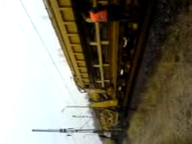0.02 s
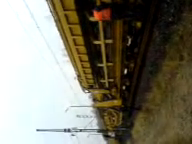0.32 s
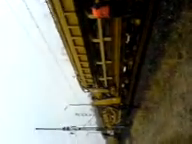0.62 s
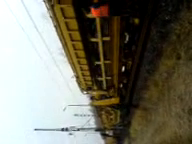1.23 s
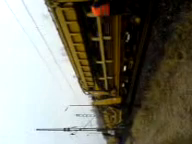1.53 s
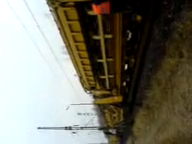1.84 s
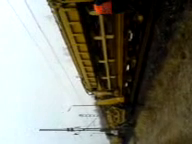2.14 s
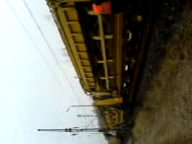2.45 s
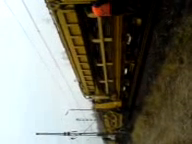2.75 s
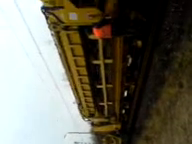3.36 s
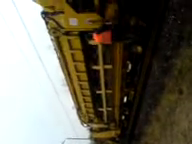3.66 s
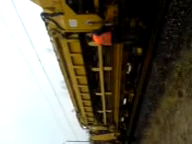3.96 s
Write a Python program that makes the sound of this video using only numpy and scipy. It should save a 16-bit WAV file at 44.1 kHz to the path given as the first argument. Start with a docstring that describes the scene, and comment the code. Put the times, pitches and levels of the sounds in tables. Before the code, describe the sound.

A track renewal machine roars and rattles close by, with metal crashes and squeals.

```python
"""A steady engine roar with gear whines and a dense rattle of chains and ballast on steel:
a track renewal machine working close by. Loads crash into the steelwork and a dry bearing squeals
on and off. The frame groans and booms under load, loudest near the end.
A small narrow-band recorder overloads on everything loud; brief overloads sound as short ticks."""
import sys
import numpy as np
from scipy import signal
from scipy.io import wavfile
from scipy.ndimage import uniform_filter1d, minimum_filter1d

SR = 44100
rng = np.random.default_rng(int(sys.argv[2]) if len(sys.argv) > 2 else 0)


def bounce(signal):
    """Save signal as a 16-bit WAV file at the path given by the first command-line argument."""
    frames = np.transpose(np.atleast_2d(signal))
    limited = np.clip(frames, -1, 1)
    pcm = np.round(limited * 32767).astype(np.int16)
    wavfile.write(sys.argv[1], SR, pcm)


N = 176400


def from_db(db):
    """Decibels to gain."""
    return 10 ** (np.asarray(db) / 20)


def unit_rms(x):
    """Scale to unit power."""
    return x / np.sqrt(np.mean(x ** 2) + 1e-20)


def seconds():
    """Time of every sample."""
    return np.arange(N) / SR


def gain_curve(points):
    """Gain over time from (time_s, level_db) points."""
    return from_db(np.interp(seconds(), *np.transpose(points)))


def gain_at(spectrum, hz):
    """Gain of a spectrum at one frequency."""
    freq_hz, level_db = np.transpose(spectrum)
    return from_db(np.interp(np.log(hz), np.log(freq_hz), level_db))


def drift(rate_hz):
    """Smooth random motion of spread 1."""
    step, settle = 40, 2000
    pole = np.exp(-2 * np.pi * rate_hz * step / SR)
    white = rng.standard_normal(N // step + settle + 2)
    slow = signal.lfilter([1], [1, -2 * pole, pole * pole], white)[settle:]
    return np.interp(np.arange(N) / step, np.arange(len(slow)), unit_rms(slow))


def resonate(x, hz, width_hz):
    """Two-pole resonance, peak gain 1."""
    radius = np.exp(-np.pi * width_hz / SR)
    feedforward = np.array([1, 0, -1]) * (1 - radius ** 2) / 2
    feedback = [1, -2 * radius * np.cos(2 * np.pi * hz / SR), radius ** 2]
    return signal.lfilter(feedforward, feedback, x + 1e-18)


def shaken(hz, width_hz):
    """A resonance driven by steady random force, levelled to unit power."""
    x = resonate(rng.standard_normal(N), hz, width_hz)
    return x / np.sqrt(uniform_filter1d(x * x, size=2600) + 1e-20)


def banded_noise(spectrum, flicker_db):
    """Quarter-octave noise bands, each flickering on its own; unit power overall."""
    edges_hz = 20 * 2 ** np.arange(0, 8.1, .25)
    out, white = 0, rng.standard_normal((2, N + SR // 2))
    for k, (low, high) in enumerate(zip(edges_hz, edges_hz[1:])):
        bandpass = signal.butter(2, [low, high], "band", fs=SR, output="sos")
        band = signal.sosfilt(bandpass, white[k % 2])[-N:]
        out += band * gain_at(spectrum, np.sqrt(low * high)) * from_db(flicker_db * drift(15.8))
    return unit_rms(out)


def envelope(start_s, end_s, attack_s, t60_s):
    """Rise around the start, hold to the end, then die away."""
    t = seconds()
    rise = np.clip((t - start_s) / attack_s + .5, 0, 1)
    return rise * from_db(-60 * np.maximum(t - end_s, 0) / t60_s)


# Engine roar level: time_s, level_db
ROAR_CURVE = [(0, -10.5), (.3, -21), (.38, -21), (.47, -18.5), (.62, -17), (1.5, -18.5), (1.6, -16),
              (1.73, -19.5), (1.9, -16.5), (2.25, -19.5), (2.6, -16), (2.85, -18.5), (3.42, -19),
              (3.55, -18), (3.68, -4), (3.8, -14), (3.9, 7), (4, -13)]
# Engine roar spectrum: freq_hz, relative_density_db
ROAR_SPECTRUM = [(25, -36), (60, -16.5), (120, -13), (200, -13), (270, -3.5), (330, 2), (420, -6),
                 (540, -10), (740, -2), (900, -6), (1150, -10), (1450, -11), (2200, -19.5)]


def engine_roar():
    """The engines roar as broad noise with an uneven throb."""
    throb_db = 0.65 * drift(rate_hz=6.5)
    return gain_curve(ROAR_CURVE) * from_db(throb_db) * banded_noise(ROAR_SPECTRUM, flicker_db=1.6)


# Gear and pump whines: pitch_hz, level_db
GEAR_TONES = [(334, -36), (1502, -34.5), (1793, -34)]
# Two drives taking load: pitch_hz, [(time_s, level_db)]
DRIVE_TONES = [(672, [(0, -28.5), (.9, -27.5), (1.3, -28), (1.8, -41), (2.15, -39), (2.25, -24),
               (2.48, -25.5), (2.6, -44.5), (4, -34.5)]), (754, [(0, -27), (.6, -26.5), (1.3, -33.5),
               (2.0, -25), (2.7, -40), (4, -26.5)])]


def whines(wander=0.0025, flutter_db=4):
    """Gears and pumps whine throughout, drives sing as they take load; all waver and flutter."""
    voices = [(hz, from_db(level_db)) for hz, level_db in GEAR_TONES]
    voices += [(hz, gain_curve(load)) for hz, load in DRIVE_TONES]
    out = 0
    for pitch_hz, gain in voices:
        phase = 2 * np.pi * np.cumsum(pitch_hz * (1 + wander * drift(14.0))) / SR
        flutter = from_db(flutter_db * drift(8.3))
        out += gain * unit_rms(np.sin(phase) * flutter)
    return out


# Chain and ballast rattle level: time_s, level_db
RATTLE_CURVE = [(0, -11.5), (.3, -16.5), (.43, -13), (.7, -13.5), (.83, -16), (.92, -11.5), (1.0, -17),
                (1.08, -13.5), (1.16, -13.5), (1.5, -18), (1.75, -15.5), (1.9, -13.5), (2.1, -15),
                (2.8, -16), (3.55, -15), (3.64, -9.5), (4, -5)]
# Rattle spectrum: freq_hz, relative_density_db
RATTLE_SPECTRUM = [(900, -21.5), (1400, -17), (1800, -3), (2050, -2.5), (2350, 0.5), (2650, 0),
                   (2950, -10.5), (3250, -6), (3550, -12), (4200, -5.5)]


def rattle(knocks_per_s=320, spread_db=1.5, t60_s=0.099, ring_db=-2):
    """Links and stones knock on many short-ringing steel parts, over a wash of grinding."""
    parts_hz = np.geomspace(1650, 3200, num=30)
    force = from_db(spread_db * np.minimum(rng.exponential(1, N), 4)) * rng.choice([-1, 1], N)
    knocks = force * (rng.random(N) < knocks_per_s / SR)
    struck_part = rng.integers(0, len(parts_hz), N)
    width_hz = np.log(1000) / (np.pi * t60_s)
    rings = sum(gain_at(RATTLE_SPECTRUM, hz) * resonate(knocks * (struck_part == k), hz, width_hz)
                for k, hz in enumerate(parts_hz))
    grinding = banded_noise(RATTLE_SPECTRUM, flicker_db=1.5)
    return gain_curve(RATTLE_CURVE) * unit_rms(from_db(ring_db) * unit_rms(rings) + grinding)


# Chute and frame resonances: pitch_hz, width_hz, relative_db
CHUTE_MODES = [(1510, 790, -7.5), (2020, 300, -6), (2380, 210, -8), (2695, 1300, -0.5)]
FRAME_MODES = [(328, 230, -7), (735, 134, -2)]
# Loads hitting the steelwork: start_s, length_s, clatter_db, thud_db, ring_hz, ring_db
LOAD_CRASHES = [(0.037, 0.027, -31, -13.5, 800, -8), (0.062, 0.0089, -13, -24.5, 2090, -11),
                (0.382, 0.02, -11.5, -26, 2380, -9.5), (1.043, 0.018, -13.5, -35, 3030, -17),
                (1.776, 0.031, -5, -13, 2680, -21), (1.811, 0.012, -11, -9.5, 2070, -8),
                (3.367, 0.0097, -16.5, -18, 2624, -7), (3.388, 0.0055, -29, -36, 2810, -12),
                (3.576, 0.014, -6.5, -17, 2020, -20), (3.624, 0.059, -6.5, -17.5, 2345, -15),
                (3.759, 0.09, -8, -17.5, 2320, -16), (3.844, 0.067, -4.5, -17, 2500, -11),
                (3.926, 0.029, -3, -4.5, 2380, -12)]


def crashes():
    """Each load is a burst of contacts that shakes the chute, the frame and one ringing part."""
    chute = unit_rms(sum(from_db(db) * shaken(hz, width_hz) for hz, width_hz, db in CHUTE_MODES))
    frame = unit_rms(sum(from_db(db) * shaken(hz, width_hz) for hz, width_hz, db in FRAME_MODES))
    out = 0
    for start_s, length_s, clatter_db, thud_db, ring_hz, ring_db in LOAD_CRASHES:
        burst = envelope(start_s, start_s + length_s, attack_s=0.015, t60_s=0.18)
        ring = from_db(ring_db) * shaken(ring_hz, width_hz=68)
        out += burst * (from_db(clatter_db) * chute + from_db(thud_db) * frame + ring)
    return out


# Dry bearing squeals: middle_s, length_s, pitch_hz, glide_hz_per_s, level_db
BEARING_SQUEALS = [(0.1, 0.1, 2180, 2, -18.5), (0.53, 0.14, 1940, -7.5, -18.5),
                   (0.781, 0.19, 1877, -500, -23.5), (0.907, 0.069, 3340, 6, -20.5),
                   (1.072, 0.15, 3198, -0.5, -24), (1.294, 0.25, 3330, -0.5, -23),
                   (1.303, 0.95, 3340, 0, -29), (1.898, 0.14, 2657, -1.5, -19),
                   (1.954, 0.19, 2514, -1, -20.5), (2.972, 0.12, 3160, 2801.5, -27.5),
                   (3.098, 0.054, 3420, 2, -19), (3.427, 0.082, 1988, 0, -18.5),
                   (3.435, 0.18, 3000, 999.5, -27.5)]


def squeals(roughness=0.73, slip_hz=28, wander=0.002074, scrape_db=-4.5):
    """Dry steel scrapes and sings, swelling and fading; uneven slipping roughens the note."""
    out = 0
    for middle_s, length_s, pitch_hz, glide_hz_per_s, level_db in BEARING_SQUEALS:
        t = np.clip(seconds() - middle_s, -length_s / 2, length_s / 2)
        slip = (drift(slip_hz) + 1j * drift(slip_hz)) / np.sqrt(2)  # jitters level and phase
        grip = np.sqrt(1 - roughness ** 2) + roughness * slip
        hz = (pitch_hz + glide_hz_per_s * t) * (1 + wander * drift(19.3))
        phase = 2 * np.pi * np.cumsum(hz) / SR
        note = np.sqrt(2) * np.real(grip * np.exp(1j * phase))
        scrape = from_db(scrape_db) * shaken(pitch_hz, width_hz=190)
        swell = np.sqrt(np.abs(np.cos(np.pi * t / length_s)))
        out += from_db(level_db) * swell * (note + scrape)
    return out


# Brief peaks in the din: start_s
OVERLOAD_TICKS_S = [.242, .347, .51, .703, .738, .900, .949, 1.019, 1.358, 1.944, 1.978, 2.038, 2.068,
                    2.144, 2.215, 2.265, 2.319, 2.645, 3.519, 3.546]


def overload_ticks(pitches_hz=(760, 2130), t60_s=0.014, peak_db=-3.8):
    """Short ticks: sharp peaks added to the din at set times briefly overload the recorder."""
    impulses = np.zeros(N)
    impulses[(np.array(OVERLOAD_TICKS_S) * SR).astype(int)] = from_db(peak_db)
    t = np.arange(SR // 20) / SR
    tick = from_db(-60 * t / t60_s) * sum(np.sin(2 * np.pi * hz * t) for hz in pitches_hz)
    return signal.fftconvolve(impulses, tick / np.abs(tick).max())[:N]


# Frame booms and groans: start_s, end_s, pitch_hz, width_hz, level_db
FRAME_GROANS = [(.445, 0.471, 464, 31, -15.5), (0.457, 0.529, 780, 70, -19), (1.575, 1.613, 365, 60, -22),
                (1.759, 1.83, 271, 32, -18), (1.84, 2.328, 284, 80, -22.5), (2.022, 2.052, 735, 40, -15.5),
                (2.066, 2.28, 853, 72, -22), (2.45, 2.626, 378, 110, -23.5), (3.5, 3.525, 802, 43, -16),
                (3.594, 3.988, 339, 22, -11), (3.88, 3.92, 352, 88, -1), (3.9, 4.05, 614, 93, -6),
                (3.688, 4.0, 841, 32, -18.5), (3.76, 3.97, 1145, 44, -12.5), (3.803, 4.0, 98, 54, -17.5)]


def groans():
    """Jolts and rubbing under load make one steel part after another boom or groan."""
    out = 0
    for start_s, end_s, pitch_hz, width_hz, level_db in FRAME_GROANS:
        load = envelope(start_s, end_s, attack_s=0.027, t60_s=0.099)
        out += from_db(level_db) * load * shaken(pitch_hz, width_hz)
    return out


def limit_peaks(x, ceiling):
    """Turn the highest peaks smoothly down to a ceiling."""
    gain = np.minimum(1, ceiling / (np.abs(x) + 1e-20))
    return x * uniform_filter1d(minimum_filter1d(gain, size=131), size=131)


def scene():
    """The whole machine in mono, heard from beside the track."""
    din = limit_peaks(whines() + engine_roar() + rattle() + squeals(), ceiling=0.69)
    return (din + overload_ticks() + crashes() + groans())[None]


def record(dry, band_edge_hz=3386, stop_hz=5200, clip_level=0.69, top_hz=15900):
    """A narrow-band input clips hard; a last low-pass trims the top of the distortion."""
    narrow = signal.sosfilt(signal.butter(12, band_edge_hz, fs=SR, output="sos"), dry)
    narrow = signal.sosfilt(signal.cheby2(10, 60, stop_hz, fs=SR, output="sos"), narrow)
    clipped = np.clip(narrow, -clip_level, clip_level)
    return signal.sosfiltfilt(signal.butter(16, top_hz, fs=SR, output="sos"), clipped)


dry = scene()
out = record(dry)
bounce(out)
```